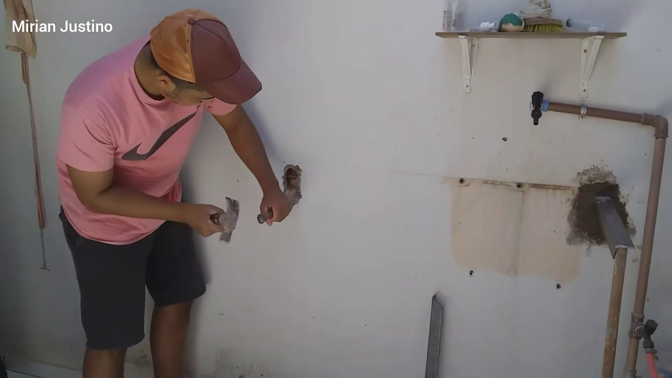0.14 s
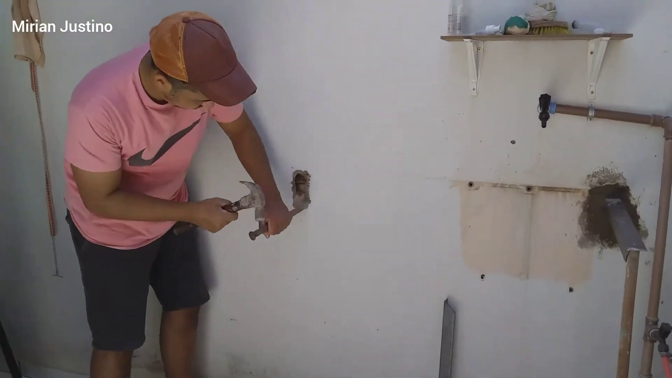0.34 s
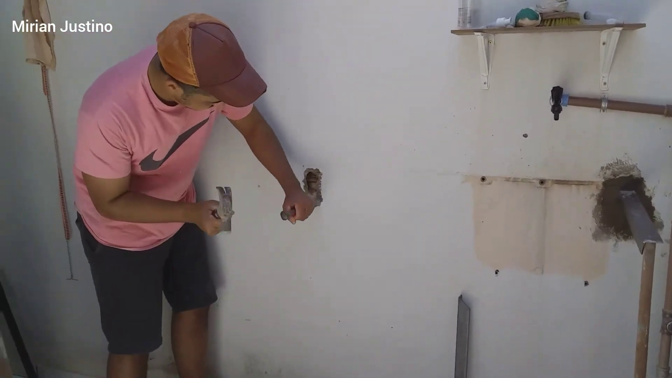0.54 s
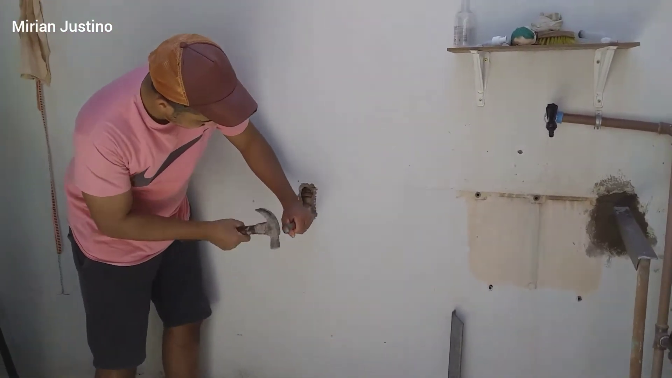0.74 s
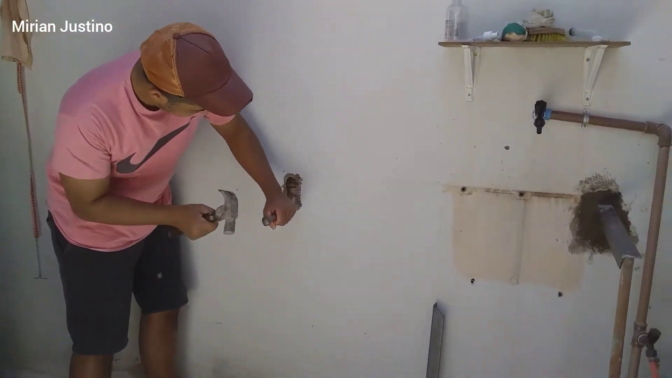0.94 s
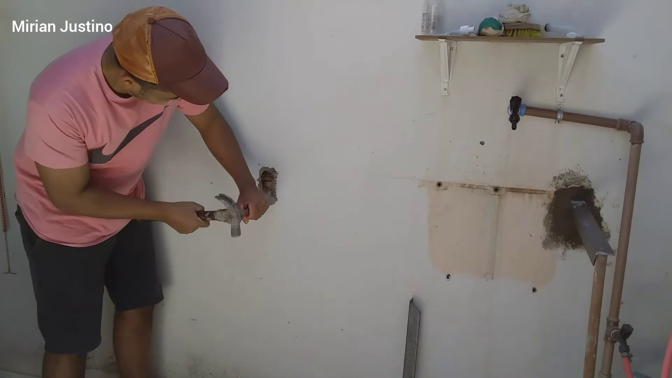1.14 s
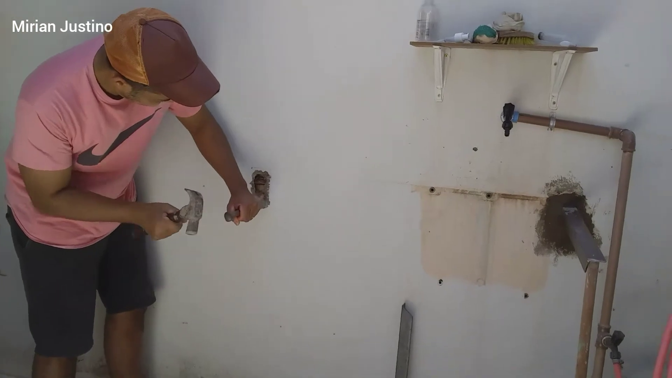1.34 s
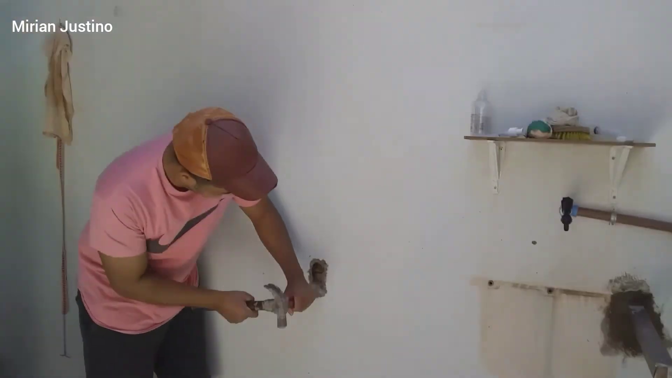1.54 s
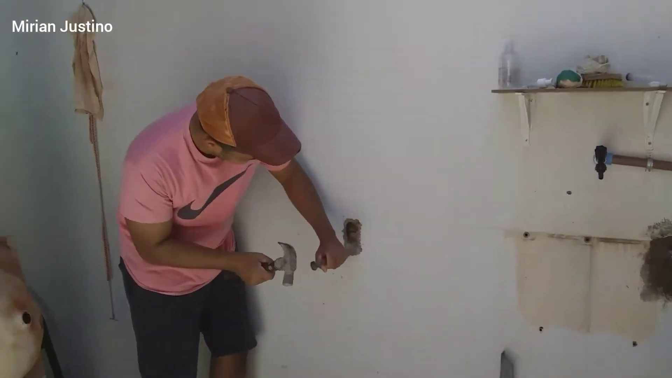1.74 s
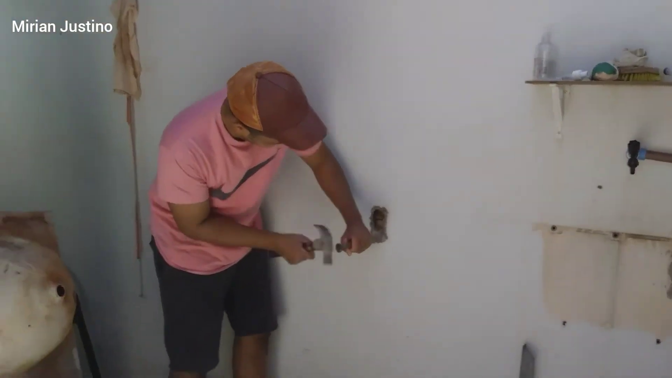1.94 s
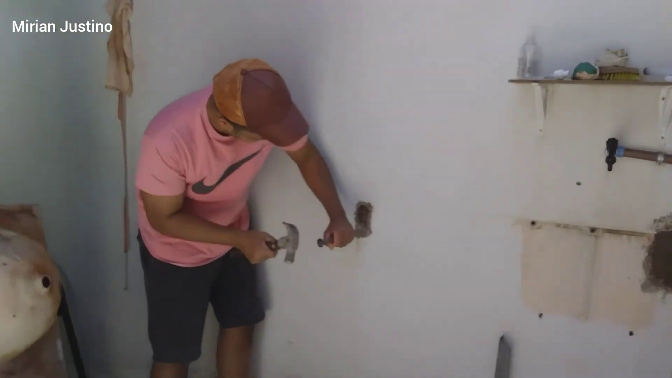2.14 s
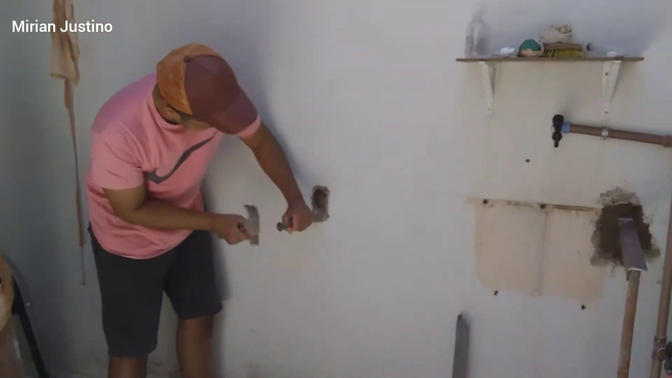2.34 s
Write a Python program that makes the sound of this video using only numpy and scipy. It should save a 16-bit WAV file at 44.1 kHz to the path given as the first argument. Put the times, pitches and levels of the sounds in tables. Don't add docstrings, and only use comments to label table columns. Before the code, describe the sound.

Five hard hammer blows on a steel chisel ring and echo in a small bare masonry room

```python
import sys
import numpy as np
from scipy import signal
from scipy.fft import rfft, irfft
from scipy.io import wavfile
from scipy.ndimage import uniform_filter1d

SR = 44100
rng = np.random.default_rng(int(sys.argv[2]) if len(sys.argv) > 2 else 0)


def voltage_ratio(level):
    return 10 ** (np.asarray(level, float) / 20)


def generate_wav(signal):
    frames = np.transpose(np.atleast_2d(signal))
    scaled = np.clip(frames, -1, 1) * 32767
    pcm = np.round(scaled).astype(np.int16)
    wavfile.write(sys.argv[1], SR, pcm)


N = 103635


def rms_one(x):
    return x / np.sqrt(np.mean(x ** 2) + 1e-20)


def at_hz(points, hz):
    curve_hz, values = np.array(points).T
    return np.interp(np.log(hz), np.log(curve_hz), values)


def shape(x, db_of_hz):
    hz = np.maximum(np.fft.rfftfreq(x.shape[-1], 1 / SR), 1)
    return irfft(rfft(x) * voltage_ratio(db_of_hz(hz)), x.shape[-1])


def burst(t, rise_s, t60_s):
    swell = np.exp(np.minimum(t, 0) * 3 / rise_s)
    return np.where(t < 0, swell, voltage_ratio(-60 * np.maximum(t, 0) / t60_s))


def even(x, db_of_hz):
    click = shape(np.arange(len(x)) == SR // 100, db_of_hz)
    return click * np.sqrt(np.sum(x ** 2) / np.sum(click ** 2))


def echo():
    # (frequency [Hz], t60 [s])
    room = [(60, 1), (160, 0.47), (420, 0.33), (900, 0.37), (1300, 0.23), (2900, 0.29), (7700, 0.24),
            (16000, 0.17)]
    build_s, late_db, late_stretch = 0.0022, -25, 2.24
    edges_hz = 22 * 2 ** np.arange(0, 9.7, .4)
    t = np.arange(SR * 3 // 4) / SR
    spectrum, hz = rfft(rng.standard_normal(len(t))), np.fft.rfftfreq(len(t), 1 / SR)
    reply = np.zeros(len(t))
    for low_hz, high_hz in zip(edges_hz, edges_hz[1:]):
        band = irfft(spectrum * ((hz >= low_hz) & (hz < high_hz)), len(t))
        t60s = t / at_hz(room, np.sqrt(low_hz * high_hz))
        reply += band * (voltage_ratio(-60 * t60s) + voltage_ratio(late_db - 60 * t60s / late_stretch))
    reply *= 1 - np.exp(-t / build_s)
    return reply / np.sqrt(np.sum(reply ** 2))


def noise_floor():
    # (frequency [Hz], level [dB])
    floor_colour = [(20, -26), (55, -3), (115, 3.5), (350, -8), (800, -16), (1500, -28), (4000, -26),
                    (16000, -41)]
    return voltage_ratio(-65) * rms_one(shape(rng.standard_normal(N), lambda f: at_hz(floor_colour, f)))


def squeaks():
    # (start [s], length [s], frequency [Hz], level [dB])
    chip = [
        (.472, .03, 6250, -61),
        (.52, .02, 6300, -62),
        (.543, .03, 6270, -60),
        (.53, .04, 6540, -65),
    ]
    t = np.arange(N) / SR
    waver = 1 + 0.23 * rms_one(uniform_filter1d(rng.standard_normal(N), size=150))
    out = np.zeros(N)
    for start_s, length_s, hz, db in chip:
        swell = np.sin(np.pi * np.clip((t - start_s) / length_s, 0, 1))
        out += voltage_ratio(db) * swell * np.sin(2 * np.pi * hz * t)
    return waver * out


def grit(showers, grains_per_s):
    # (frequency [Hz], level [dB per Hz])
    grain_colour = [(530, -58), (900, -18.5), (1650, -7), (2190, -17), (2530, -6.5), (4120, -3), (8660, -5),
                    (14600, -11), (16500, -29.5)]
    spread_db = 3.0
    t, out = np.arange(N) / SR, np.zeros(N)
    for peak_s, rise_s, t60_s, db, tilt_db in showers:
        def colour(f):
            tilt = tilt_db * np.log2(np.clip(f, 900, 16000) / 4000)
            return at_hz(grain_colour, f) + tilt - 24 * np.maximum(0, np.log2(900 / f))

        size = voltage_ratio(spread_db * np.minimum(rng.exponential(1, N), 5))
        grains = (rng.random(N) < grains_per_s / SR) * size * rng.choice([-1, 1], N)
        out += voltage_ratio(db) * burst(t - peak_s, rise_s, t60_s) * rms_one(shape(grains, colour))
    return out + voltage_ratio(-5) * signal.fftconvolve(out, echo())[:N]


def trickle():
    # (peak [s], rise [s], t60 [s], level [dB], tilt [dB per octave])
    sparse = [
        (.03, 0.14, 0.7, -68.5, 2.6),
        (.13, 0.056, 0.45, -68, 3),
        (1.47, .03, 0.11, -66.5, 3),
        (1.55, 0.018, 0.44, -70, 0.82),
        (2.207, 0.0023, 0.057, -66, 1.5),
    ]
    return grit(sparse, 300)


def grit_showers():
    # (peak [s], rise [s], t60 [s], level [dB], tilt [dB per octave])
    dense = [
        (.228, 0.056, .1, -37, -0.5),
        (.4, .04, 0.34, -66.5, 2.5),
        (.6, 0.072, .25, -53.5, -0.5),
        (.66, 0.056, 0.29, -57.5, -4.5),
        (.692, 0.035, .15, -47.5, 3.5),
        (1.26, 0.011, .15, -58.5, -4),
        (2.225, 0.025, 0.32, -55, -8.5),
        (2.289, 0.0012, 0.072, -35, 0),
    ]
    return grit(dense, 6000)


def wall_booms(t, thud_db):
    # (frequency [Hz], swell [s], t60 [s])
    modes = [(56, .125, .6), (113, .05, .35), (177, .045, .25)]
    modes_db = [-42, -32.5, -23]
    out = np.zeros(len(t))
    for (hz, swell_s, t60_s), db in zip(modes, modes_db):
        tone = np.sin(2 * np.pi * hz * np.maximum(t, 0))
        out += voltage_ratio(db + 2 * thud_db) * burst(t - swell_s, swell_s, t60_s) * tone
    return out


def low_push(t, db):
    late_s, width_s = .012, .002
    return voltage_ratio(db) * np.exp(-((t - late_s) / width_s) ** 2)


def wall_thud(t, db, centre_hz):
    delay_s, rise_s, t60_s, width_octaves = 0.0045, .004, 0.02, 0.82

    def dull(f):
        return -6 * (np.log2(f / centre_hz) / width_octaves) ** 2

    noise = rms_one(shape(rng.standard_normal(len(t)), dull))
    thud = voltage_ratio(-13 + db) * noise * burst(t - delay_s, rise_s, t60_s)
    return thud, even(thud, dull)


def contact_crack(t, db):
    # (frequency [Hz], level [dB per Hz])
    crack_colour = [(120, -39), (200, -10), (1180, -13), (2800, -8.5), (3250, -10.5), (5650, -6.5),
                    (7060, -18), (12100, -20.5), (16500, -28.5)]
    rise_s, t60_s = .0022, 0.027

    def sharp(f):
        return at_hz(crack_colour, f)

    noise = rms_one(shape(rng.standard_normal(len(t)), sharp))
    crack = voltage_ratio(-6 + db) * noise * burst(t, rise_s, t60_s)
    return crack, even(crack, sharp)


def steel_ring(t, family_db):
    modes_hz = [2885, 2755, 2345, 4592, 4700, 4937, 5270, 5782, 3530, 2915, 8200, 9360, 10530, 11900, 2900,
                4605, 5775]
    modes = [(-1.5, 0.11), (-21, .1), (-32.5, .1), (-3.5, 0.14), (-5, 0.082), (-10.5, .18), (-11.5, 0.12),
             (-10, 0.17), (-28.5, 0.05), (-6.5, .12), (-21, .06), (-27, 0.1), (-30, 0.059), (-23, 0.047),
             (-35.5, 1), (-34, 1), (-38.5, 0.42)]
    families = [1, 1, 0, 4, 4, 2, 0, 3, 0, 1, 5, 5, 5, 5, 1, 4, 3]
    grip_detune, grip_db, t60_max_s, wobble, rise_s = .001, 1.0, .5, .3, .004
    after = np.maximum(t, 0)
    ring = np.zeros(len(t))
    for hz, (db, t60_s), family in zip(modes_hz, modes, families):
        louder, sharper, phase = rng.standard_normal(3)
        level_db = db + family_db[family] + grip_db * louder
        tone = np.sin(2 * np.pi * hz * (1 + grip_detune * sharper) * after + phase)
        ring += voltage_ratio(level_db - 60 * after / min(t60_s, t60_max_s)) * tone
    grip = 1 + wobble * rms_one(uniform_filter1d(rng.standard_normal(len(t)), size=500))
    return ring * burst(t - rise_s, rise_s, np.inf) * grip


def blows():
    strikes = [
        (0.233, 0, -2, 0.5, -6.5, -1.5),
        (0.743, -5, -1, -27.5, 11.5, -1.5),
        (1.171, -4, -5.5, -44, 3.5, 0),
        (1.584, -8.5, -10, -16.5, 11, -2.5),
        (2.003, -8.5, 1.5, -23, 13, 1.5),
    ]
    contacts = [(0.5, 359, 0, -8, 1.5), (-1, 570, 6, 13.5, 2.5), (-3.5, 410, 5.5, 1.5, -3),
                (-1, 500, 5.5, 14.5, -2), (-2.5, 316, 8.5, 17, -4)]
    pushes_db = [-38, -34, -20, -18.5, -26.5]
    room_db, ring_echo_db = -2, -6
    t, out = np.arange(SR) / SR - .01, np.zeros(N + 2 * SR)
    for strike, contact, push_db in zip(strikes, contacts, pushes_db):
        time_s, db, *family_db = strike
        thud_db, thud_hz, crack_db, top_db, echo_db = contact
        ring = steel_ring(t, [0, *family_db, top_db])
        crack, crack_click = contact_crack(t, crack_db)
        thud, thud_click = wall_thud(t, thud_db, thud_hz)
        sent = voltage_ratio(ring_echo_db) * ring + (crack_click + thud_click) * (t > -.002)
        heard = voltage_ratio(room_db + echo_db) * signal.fftconvolve(sent, echo())
        heard[:len(t)] += ring + crack + thud
        heard[:len(t)] += low_push(t, push_db - db) + wall_booms(t, thud_db)
        start = int((time_s - .01) * SR)
        out[start:start + len(heard)] += voltage_ratio(db) * heard
    return out[:N]


def microphone_pair(mid):
    # (frequency [Hz], side under mid [dB])
    side_colour = [(1000, -43.5), (4000, -43.5), (8000, -21.5), (14000, -7.5)]
    scatter = rng.standard_normal(3000) * np.exp(-np.arange(3000) / 600)
    scatter /= np.sqrt(np.sum(scatter ** 2))
    side = shape(signal.fftconvolve(mid, scatter)[:N], lambda f: at_hz(side_colour, f))
    return np.array([mid + side, mid - side])


def scene():
    return microphone_pair(noise_floor() + squeaks() + trickle() + grit_showers() + blows())


def limiter(x):
    limit_db, release_db_per_s, ahead_s = -3, 249.5, 0.0019
    ramp = release_db_per_s * np.arange(N) / SR
    over_db = np.maximum(20 * np.log10(np.abs(x).max(axis=0) + 1e-9) - limit_db, 0)
    held_db = np.maximum.accumulate(over_db + ramp) - ramp
    ahead = max(int(ahead_s * SR), 1)
    early_db = np.concatenate([held_db[ahead // 2:], np.zeros(ahead // 2)])
    return np.tanh(x * voltage_ratio(-uniform_filter1d(early_db, size=ahead)))


def top_cut(x):
    return signal.sosfilt(signal.butter(12, 16810, fs=SR, output="sos"), x)


def record(dry):
    mic_high_pass = signal.butter(3, 50, "high", fs=SR, output="sos")
    mix = limiter(signal.sosfilt(mic_high_pass, dry))
    return top_cut(mix)


dry = scene()
out = record(dry)
generate_wav(out)
```